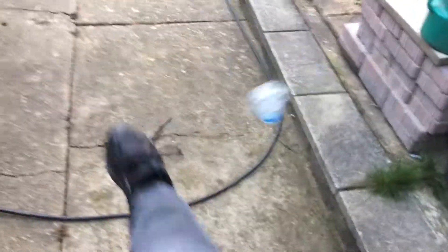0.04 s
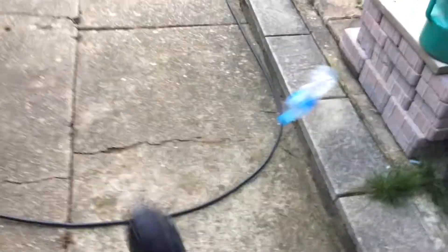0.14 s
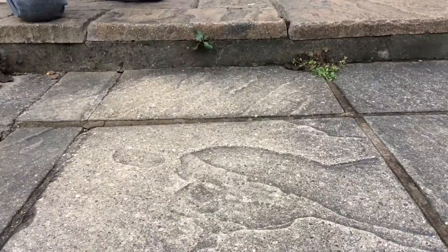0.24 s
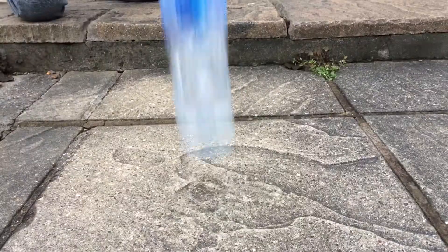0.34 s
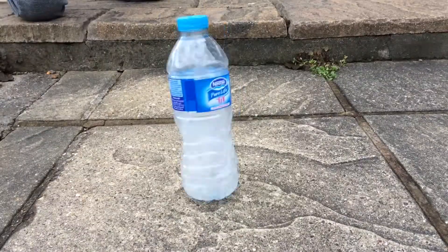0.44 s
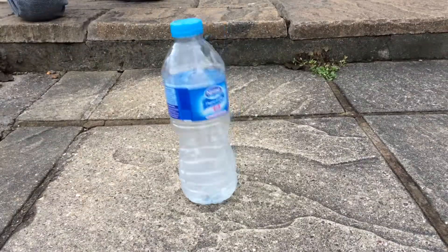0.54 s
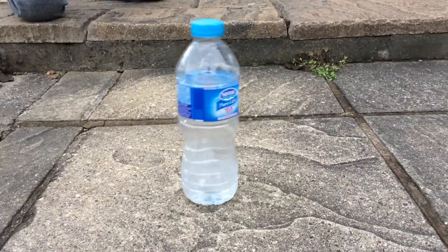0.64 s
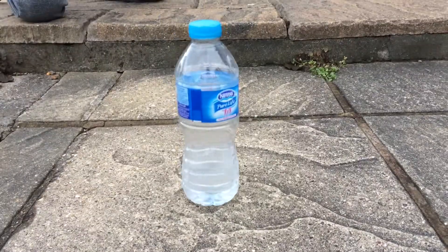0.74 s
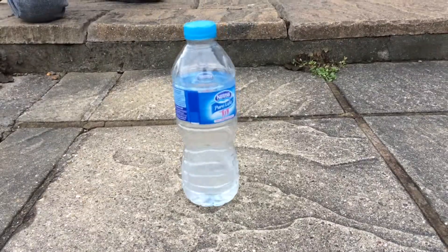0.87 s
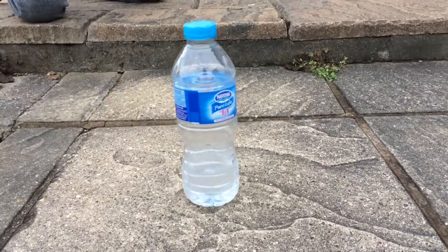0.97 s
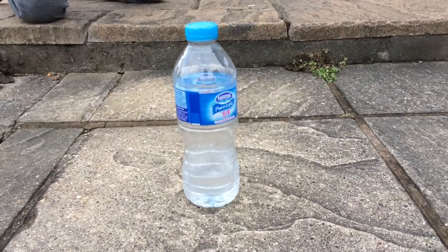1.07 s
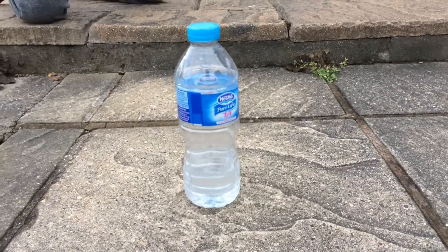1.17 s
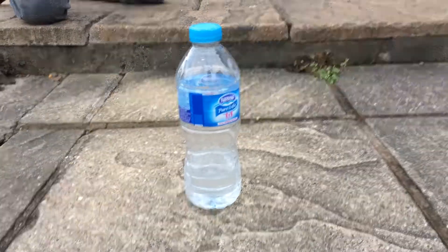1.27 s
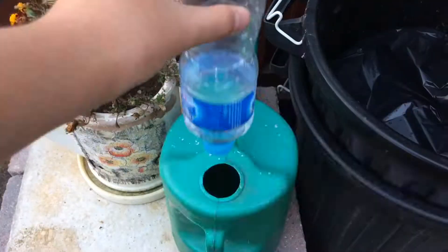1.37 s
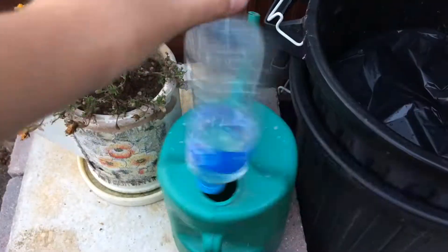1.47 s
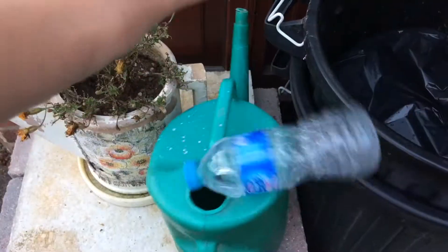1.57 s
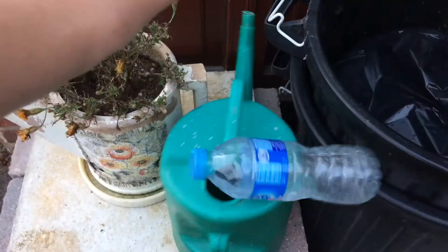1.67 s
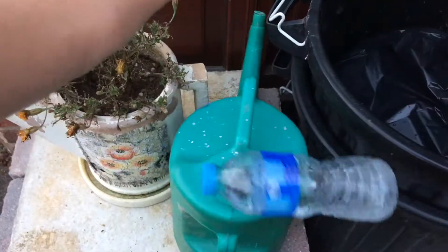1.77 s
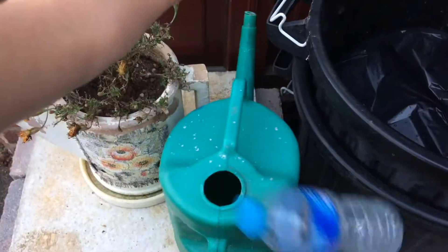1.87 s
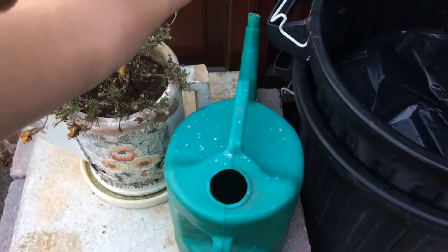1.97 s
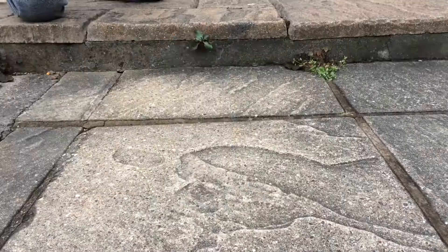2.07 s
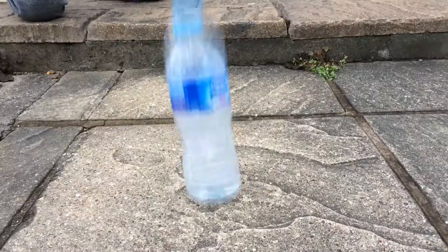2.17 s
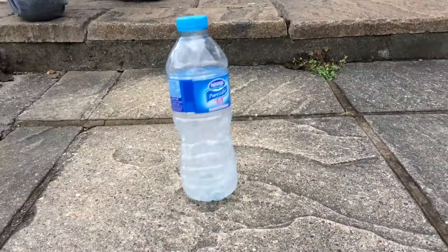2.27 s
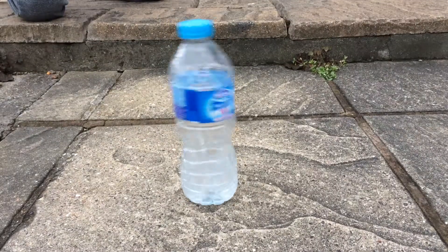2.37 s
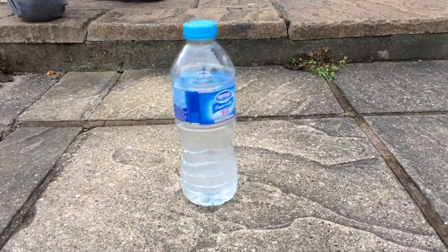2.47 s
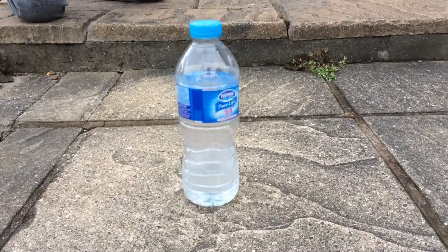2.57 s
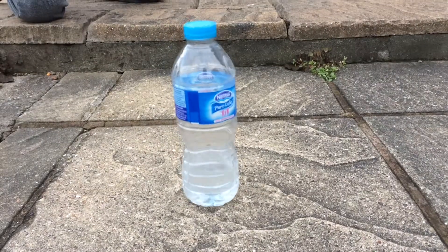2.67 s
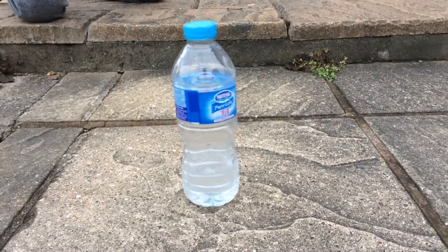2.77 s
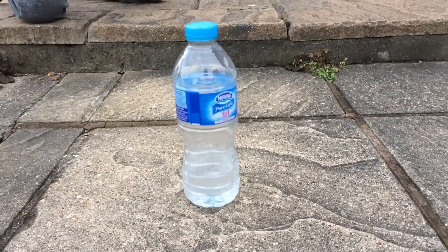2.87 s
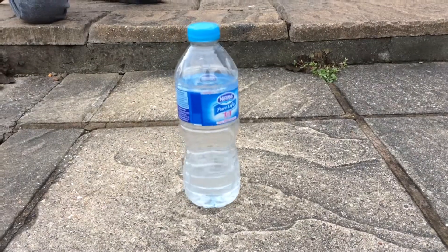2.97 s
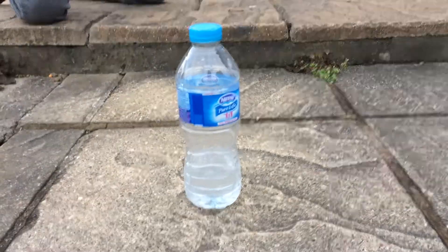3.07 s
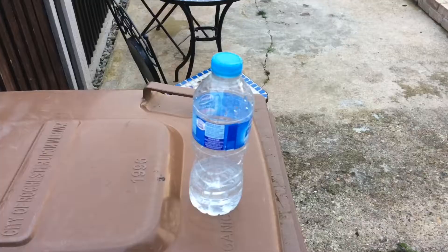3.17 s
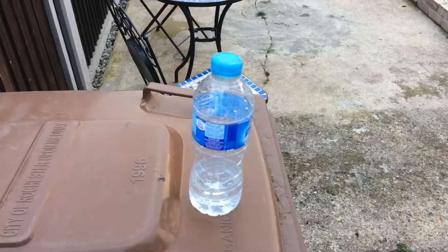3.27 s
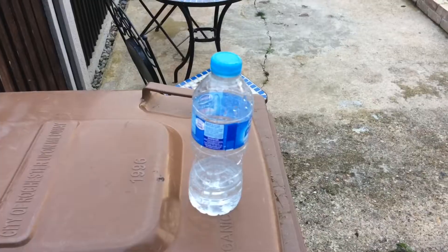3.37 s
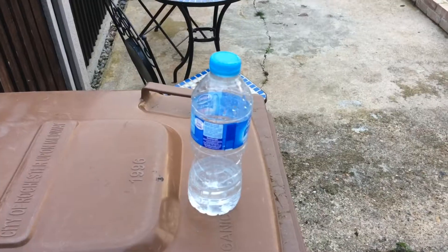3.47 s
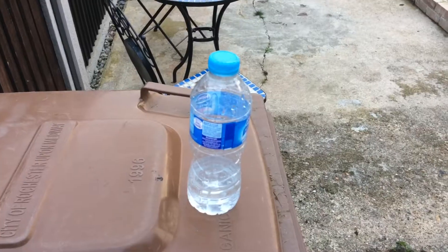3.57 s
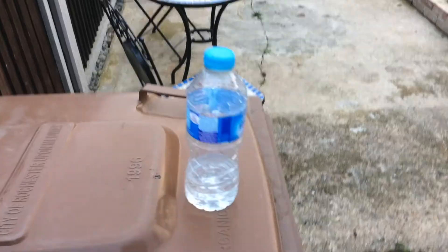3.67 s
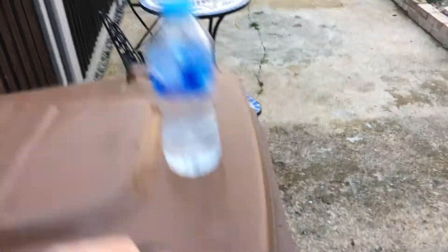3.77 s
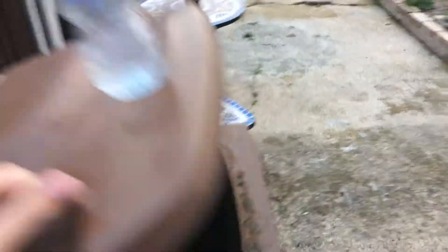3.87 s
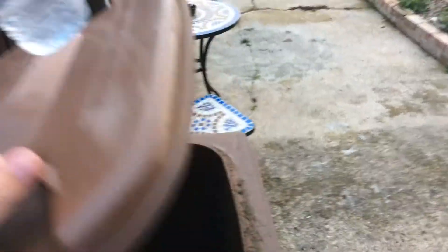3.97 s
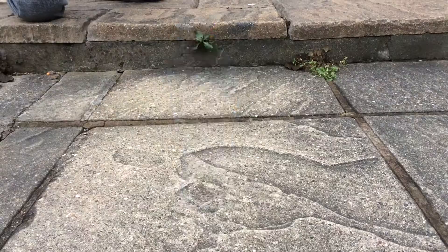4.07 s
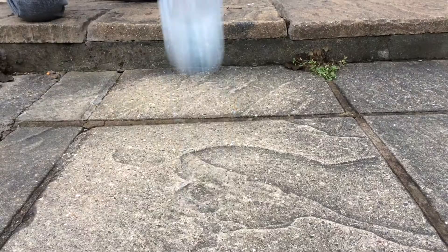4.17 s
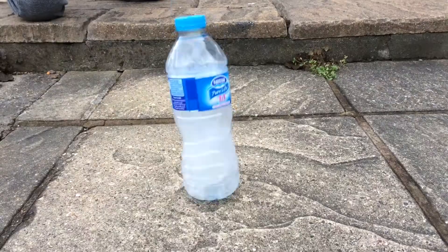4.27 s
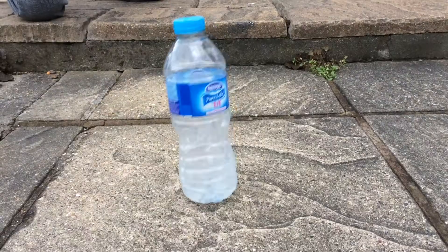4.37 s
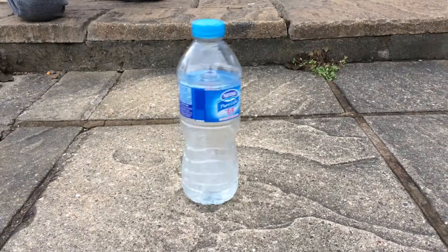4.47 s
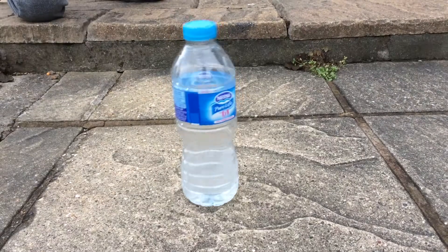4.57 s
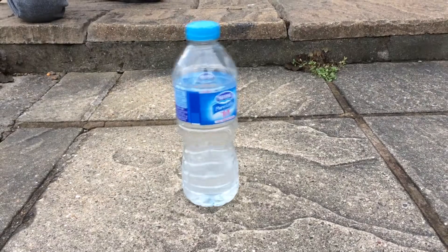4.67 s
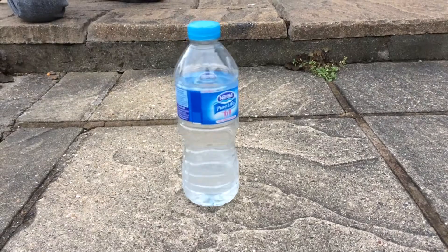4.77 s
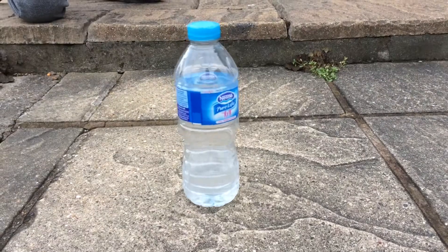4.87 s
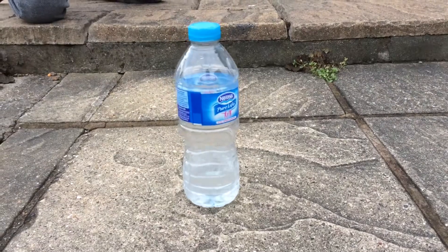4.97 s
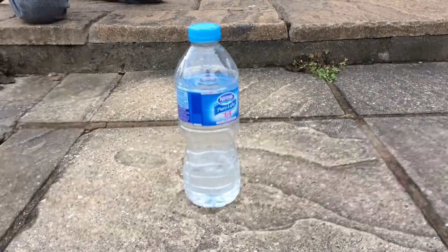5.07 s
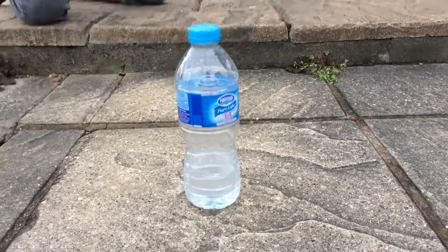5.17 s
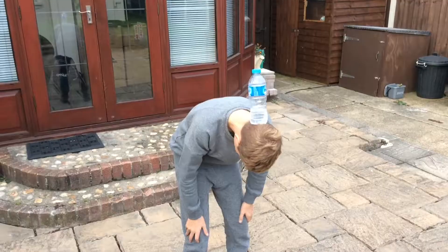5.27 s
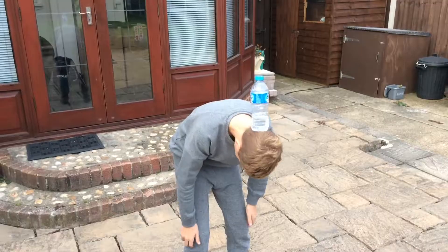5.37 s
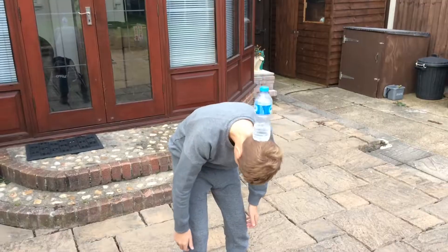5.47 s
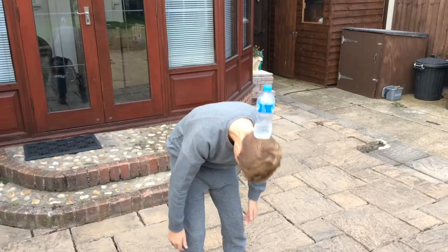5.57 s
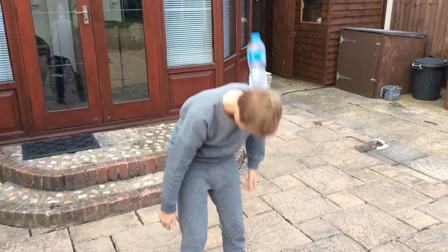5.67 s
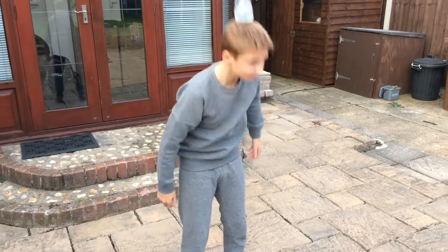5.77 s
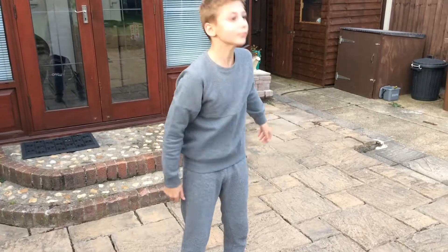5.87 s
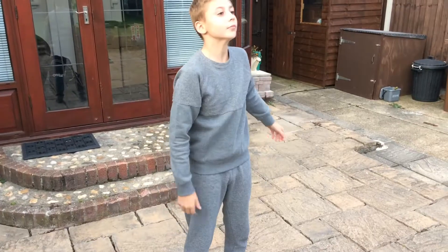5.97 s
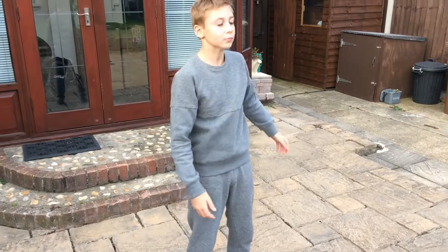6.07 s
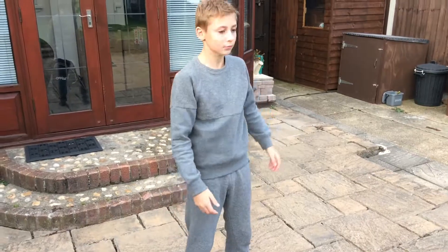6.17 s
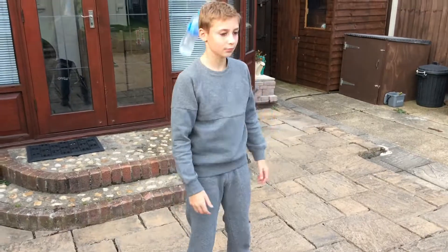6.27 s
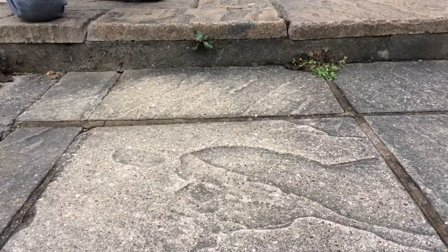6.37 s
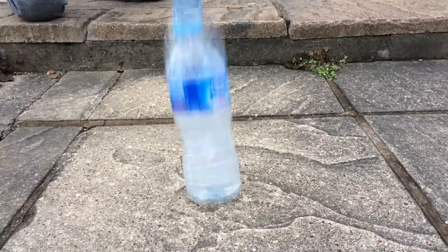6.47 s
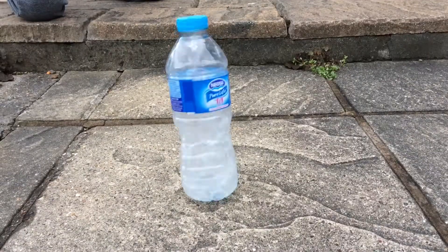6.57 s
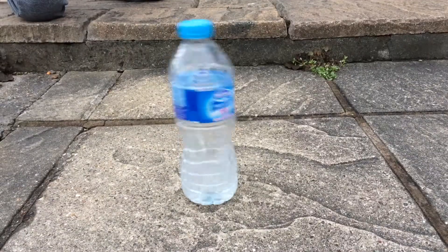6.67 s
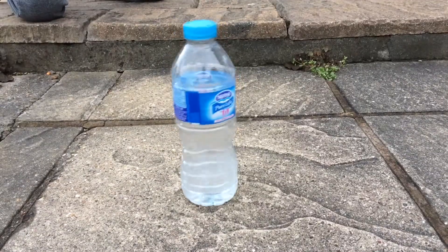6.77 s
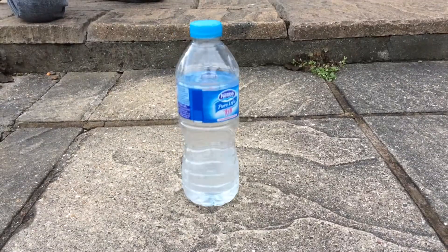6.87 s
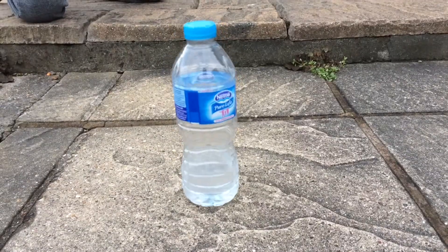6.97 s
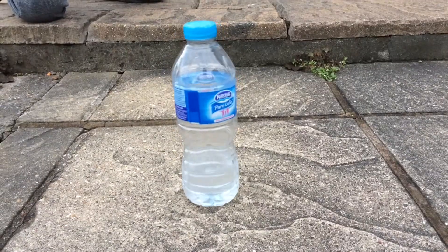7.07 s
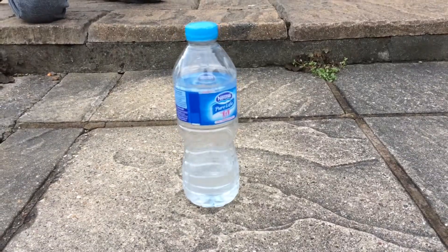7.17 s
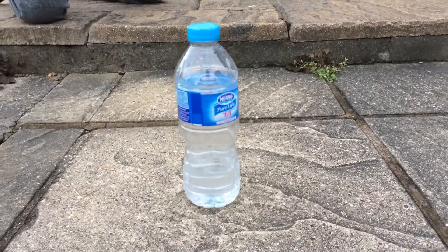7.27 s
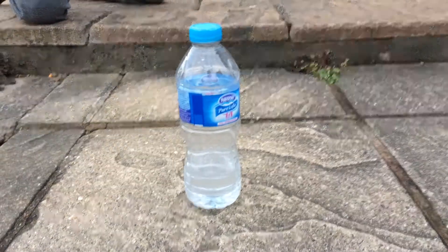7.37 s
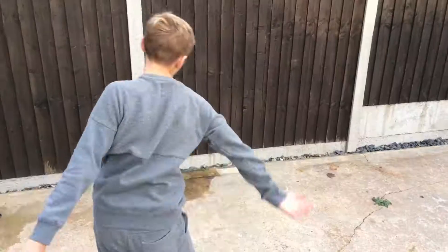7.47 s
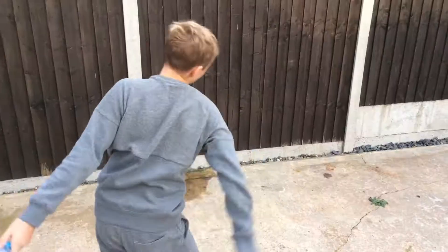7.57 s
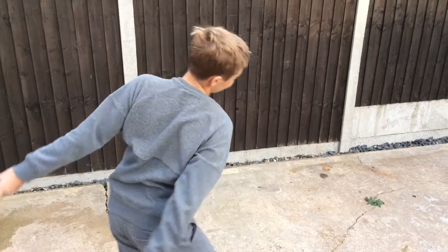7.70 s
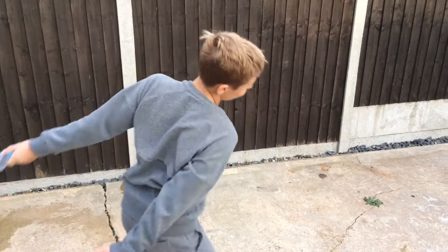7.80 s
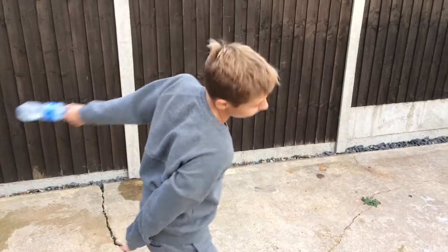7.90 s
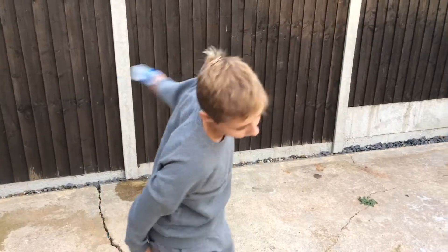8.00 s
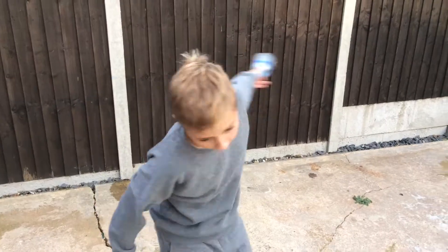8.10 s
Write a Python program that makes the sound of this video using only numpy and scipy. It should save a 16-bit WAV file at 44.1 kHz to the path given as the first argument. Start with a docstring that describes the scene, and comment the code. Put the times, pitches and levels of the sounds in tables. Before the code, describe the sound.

Quick outdoor cuts of bottle flipping: sharp plastic cracks, a watery thump repeated identically, hollow plastic knocks, a scraping slide, and quiet breezy garden air.

```python
"""A plastic crack, a thump, a low boom and a rush of water come first: bottle flips in a paved back garden.
Damped modes and shaped noise make the part-filled bottle, a hollow watering can and a bin lid pulled open.
Droplet pops and rising bubbles make the splash; noise makes the sliding, wind and far traffic; a bird whistles.
Six faded passages each have their own background; the upright landing on a slab is heard four times."""
import sys
import numpy as np
from scipy import signal
from scipy.fft import rfft, irfft, next_fast_len
from scipy.io import wavfile
from scipy.ndimage import map_coordinates

SR = 44100
rng = np.random.default_rng(int(sys.argv[2]) if len(sys.argv) > 2 else 0)


def file_out(sig):
    """Save sig as 16-bit WAV at sys.argv[1]."""
    # one column per channel
    cols = np.atleast_2d(sig).T
    # limit, then scale
    lim = np.clip(cols, -1, 1)
    pcm = np.round(lim * 32767).astype(np.int16)
    wavfile.write(sys.argv[1], SR, pcm)


N = 358966
TOP_HZ = 15450  # upper band limit


def amp(db):
    """Decibels to gain."""
    return 10 ** (np.asarray(db) / 20)


def unit(x):
    """x at rms 1."""
    return x / np.sqrt(np.mean(x ** 2) + 1e-20)


def clock():
    """Time axis of one blow, in seconds."""
    return np.arange(SR // 3) / SR


def timeline():
    """Time axis of the whole scene, in seconds."""
    return np.arange(N) / SR


def curves(rows):
    """One value per sample for each column after the time."""
    t_s, *columns = np.transpose(rows)
    return [np.interp(timeline(), t_s, column) for column in columns]


def wobble(knots_per_s):
    """A smooth random curve."""
    knots = rng.standard_normal(int(N * knots_per_s / SR) + 4)
    return map_coordinates(knots, [np.arange(N) * knots_per_s / SR])


def filtered(x, response):
    """x times a response of frequency."""
    size = next_fast_len(len(x) + 8192)
    spectrum = rfft(x, size) * response(np.fft.rfftfreq(size, 1 / SR))
    return irfft(spectrum, size)[:len(x)]


def noise(spectrum, size):
    """Noise of rms 1, coloured by rows of f/Hz, level/dB."""
    f_hz, level_db = np.transpose(spectrum)
    colour = lambda hz: amp(np.interp(np.log(hz + 1), np.log(f_hz), level_db))
    return unit(filtered(rng.standard_normal(size), colour))


def dying(t60_s):
    """A decay of 60 dB in t60_s."""
    return np.exp(-np.log(1000) * clock() / t60_s)


def rising(rise_s):
    """Contact onset, an exponential approach with time constant rise_s."""
    return 1 - np.exp(-clock() / rise_s)


def swell(s, hold_s, db, attack_s, release_s):
    """A gain that climbs 60 dB in attack_s up to s, holds, and falls 60 dB in release_s."""
    t = timeline() - s
    outside = np.maximum(0, np.maximum(-t / attack_s, (t - hold_s) / release_s))
    return amp(db) * np.exp(-np.log(1000) * outside)


def ring(modes, pitch, scatter, blur):
    """Damped modes; an off-centre blow scatters phases (0-1), a flexing wall widens lines by share blur."""
    out = np.zeros(len(clock()))
    for hz, db, t60_s in modes:
        step = np.sqrt(2 * np.pi * blur * hz / SR)
        wander = step * np.cumsum(rng.standard_normal(len(out)))
        start = scatter * rng.uniform(-np.pi, np.pi)
        phase = 2 * np.pi * hz * pitch * clock() + start + wander
        out += amp(db) * dying(t60_s) * np.sin(phase)
    return out


def add(track, s, sound):
    """Mix a sound into the track at s seconds."""
    part = track[max(round(s * SR), 0):][:len(sound)]
    part += sound[:len(part)]


# blows on the bottle: t/s, shell ring level/dB, crack level/dB, crack t60/s, shell pitch ratio
KNOCKS = [(.0005, -23, -16.5, 0.08, 1.0), (.4592, -11, -14, 0.07, 1.007), (1.5681, -16.5, -3, .032, .96),
          (1.662, -24.5, -46, .06, .63), (1.6755, -12.5, -19.5, 0.043, .93), (1.75, -28.5, -40, .1, .85),
          (1.898, -40, -38, .06, 1.13), (1.954, -35, -26.5, .05, 1.54)]
# thin shell modes: f/Hz before pitch ratio, level/dB, t60/s
SHELL_MODES = [(507, -20.5, 0.069), (624, -16.5, .05), (700, -18, 0.086), (903, -12.5, 0.055),
               (1109, -8, 0.059), (1218, -6, .035), (1402, 0, 0.025), (1505, -6.5, 0.03),
               (1495.4, -1, 0.031), (2052.4, -2.5, 0.05), (2140, -0.5, 0.032), (2293, -8, 0.029),
               (2270, -14, 0.013), (3124, -14.5, 0.033), (3323, -17, 0.065), (3780, -20.5, 0.033),
               (4390, -21, 0.035)]
# crack colour: f/Hz, level/dB
CRACK_SPECTRUM = [(60, -25), (300, -6.5), (700, -2.5), (1400, -1), (2700, -1.5), (3600, -2), (4800, -9.5),
                  (6500, -9), (10000, -15), (15000, -21.5)]


def bottle_shell(crack_rise_s=.0018, ring_lag_s=.0022, ring_rise_s=.00025):
    """The rim cracks first (noise); the thin shell rings (modes) once the weight follows."""
    out = np.zeros(N)
    for s, ring_db, crack_db, t60_s, pitch in KNOCKS:
        crack = rising(crack_rise_s) * dying(t60_s) * noise(CRACK_SPECTRUM, len(clock()))
        add(out, s, amp(crack_db) * crack)
        shell = rising(ring_rise_s) * ring(SHELL_MODES, pitch, scatter=.98, blur=.026)
        add(out, s + ring_lag_s, amp(ring_db) * shell)
    return out


# the water's weight hits the base: t/s, level/dB, pitch ratio
THUMPS = [(.001, -18.5, 1.69), (0.4517, -21, 0.43), (0.4609, -7, 1.0)]
# water modes: f/Hz before pitch ratio, level/dB, t60/s
WATER_MODES = [(110.1, -8, 0.06), (176, 2.5, 0.045), (255.5, -12, 0.096), (344, -23.5, 0.11)]


def water_thumps():
    """The water's weight on the base sounds a few short low modes."""
    out = np.zeros(N)
    for s, db, pitch in THUMPS:
        add(out, s, amp(db) * rising(.00069) * ring(WATER_MODES, pitch, scatter=0, blur=0))
    return out


def droplets(hz, spread, cycles, size_db, count):
    """A random stream of tiny decaying pops, rms 1; amplitude decays by 1/e in the given cycles."""
    place, tone, size = rng.random((count, 3)).T
    pitch_hz = np.clip(hz * np.exp(spread * (2 * tone - 1)), 100, TOP_HZ)[:, None]
    pop_samples = np.arange(SR // 100)
    turns = pitch_hz * pop_samples / SR
    level = amp(-size_db * np.log(1 - .99 * size))[:, None]  # few large, many small
    pops = level * np.exp(-turns / cycles) * np.sin(2 * np.pi * turns)
    at = (place * N).astype(int)[:, None] + pop_samples
    return unit(np.bincount(at.ravel(), pops.ravel(), minlength=N)[:N])


# water surges along the wall: t/s, hold/s, level/dB, release/s
SURGES = [(0, 0.011, -44, .5), (.445, .011, -54, .1), (0.477, 0.025, -40, 0.15), (.56, 0.074, -60.5, .9),
          (0.657, 0.013, -51.5, 0.17), (0.746, .025, -58.5, .09)]
# wash colour: f/Hz, level/dB
WASH_SPECTRUM = [(200, -7), (600, -3.5), (1400, 1.5), (4000, -5), (8000, -13), (15000, -22)]


def water_surges(attack_s=.032, wash_db=-5, drops_db=-1.5, fizz_db=-13):
    """Water along the wall: low drops, high fizz and a noise wash under shared swells."""
    drops = droplets(hz=2400, spread=1.3, cycles=2, size_db=5, count=5000)
    fizz = droplets(hz=8000, spread=.4, cycles=5, size_db=5, count=900)
    flow = sum(swell(s, hold_s, db, attack_s, release_s) for s, hold_s, db, release_s in SURGES)
    wash = noise(WASH_SPECTRUM, N)
    return flow * (amp(drops_db) * drops + amp(fizz_db) * fizz + amp(wash_db) * wash)


# echo colours, near and far: f/Hz, level/dB
NEAR_SPECTRUM = [(40, -9.5), (120, -3), (500, -2.5), (1500, -5.5), (3500, -1.5), (8000, 1), (15000, 2)]
FAR_SPECTRUM = [(40, -10.5), (120, 0), (600, -4), (1200, -3), (2100, -4.5), (4000, -1.5), (8000, -7.5),
                (15000, -15.5)]


def yard(x, near_db=-12, near_t60_s=.1, far_db=-23, far_t60_s=.38, wall_db=-24, wall_delay_s=.028):
    """Steps and fences scatter at once, the house wall later, the far garden longest and dullest."""
    def echo(db, spectrum, t60_s, rise_s):
        """A decaying noise response whose total energy is set by db."""
        tail = noise(spectrum, len(clock())) * rising(rise_s) * dying(t60_s)
        return amp(db) * tail / np.linalg.norm(tail)

    answer = echo(near_db, NEAR_SPECTRUM, near_t60_s, rise_s=.012)
    answer += echo(far_db, FAR_SPECTRUM, far_t60_s, rise_s=.02)
    add(answer, wall_delay_s, echo(wall_db, FAR_SPECTRUM, .059, rise_s=.00067))
    return signal.fftconvolve(x, answer)[:N]


# the opening blow's boom at 0 s, then wind gusts on the microphone: t/s, hold/s, level/dB
LOW_SWELLS = [(0, .02, -41), (0.488, .03, -51.5), (1.07, .02, -52.5), (1.353, .03, -46.5),
              (5.55, .03, -56.5), (6.22, .01, -59)]
# low colour of boom and wind: f/Hz, level/dB
BUFFET_SPECTRUM = [(15, -16.5), (45, -8.5), (78, 1), (130, -2.5), (190, -8), (280, -10.5), (420, -20),
                   (900, -45.5), (4000, -85.5)]


def boom_and_gusts(attack_s=.35, release_s=.5):
    """Swells of low noise: the opening blow's boom at 0 s, then wind gusts on the microphone."""
    gain = sum(swell(*row, attack_s, release_s) for row in LOW_SWELLS)
    return gain * noise(BUFFET_SPECTRUM, N)


# background colours: f/Hz, level/dB
TOWN_SPECTRUM = [(30, -11), (200, 3), (450, -1), (950, -2), (1400, -4.5), (2200, -18.5), (4000, -18),
                 (15000, -44)]
TYRES_SPECTRUM = [(200, -31), (600, -13), (950, 3.5), (1300, -3.5), (2000, -12), (5000, -34.5)]
HISS_SPECTRUM = [(100, -5), (2500, 0.5), (4500, -5), (8000, -3), (15000, -8)]


def background(tyres_sway_db=2.4, wind_flutter_db=3.5):
    """Town rumble, swaying far tyres, steady hiss and fluttering wind, each a coloured noise."""
    town = noise(TOWN_SPECTRUM, N)
    tyres = noise(TYRES_SPECTRUM, N) * amp(tyres_sway_db * wobble(3.5))
    hiss = noise(HISS_SPECTRUM, N)
    wind = unit(noise(BUFFET_SPECTRUM, N) * amp(wind_flutter_db * wobble(16)))
    return town, tyres, hiss, wind


# the landing passage: start/s, end/s
LANDING = (.272, 1.402)
# drone course: t/s, f/Hz, level/dB
DRONE = [(0.67, 214, -50.5), (0.69, 209, -53), (0.97, 225.5, -51.5), (1.146, 203.5, -59), (1.39, 193, -53)]


def drone(wobble_knots_per_s=110, swell_s=.34):
    """A narrow low drone behind the landing: random curves modulate two quadrature tones."""
    hz, db = curves(DRONE)
    phase = 2 * np.pi * np.cumsum(hz) / SR
    in_phase = wobble(wobble_knots_per_s) * np.sin(phase)
    quadrature = wobble(wobble_knots_per_s) * np.cos(phase)
    t = timeline()
    gate = np.clip((t - LANDING[0]) / swell_s, 0, 1) * (t < LANDING[1])
    return amp(db) * unit(in_phase + quadrature) * gate


def snap(hz, t60_s, below_db=-12, above_db=-15):
    """One small burst, a broad hump of noise around hz."""
    hump = [(hz / 20, 2 * below_db), (hz / 4, below_db / 2), (hz, 0),
            (hz * 3, above_db), (hz * 10, 2 * above_db)]
    return rising(.00056) * dying(t60_s) * noise(hump, len(clock()))


# drops fall back inside the bottle: t/s, bubble level/dB, starting f/Hz, t60/s
BUBBLES = [(0.3434, -34, 825, .027), (.666, -39, 536, 0.034), (.745, -30.5, 1110, .021),
           (.848, -42, 1184, 0.038), (.849, -45.5, 1740, .04), (.919, -38.5, 514, 0.038),
           (1.008, -43, 444, 0.049), (1.293, -42, 520, 0.034)]


def bubbles(glide_per_s=3.3, slap_db=-13, slap_hz=1670, slap_t60_s=.026):
    """Each falling drop slaps and traps a bubble that rings and rises in pitch."""
    out = np.zeros(N)
    t = clock()
    for s, db, hz, t60_s in BUBBLES:
        tone = np.sin(2 * np.pi * hz * t * (1 + glide_per_s * t))
        bubble = rising(.0023) * dying(t60_s) * tone
        slap = amp(slap_db) * snap(slap_hz, slap_t60_s)  # relative to its bubble
        add(out, s, amp(db) * (bubble + slap))
    return out


# single snaps of the thin shell, and a slap of water in flight at .437 s:
# t/s, level/dB, brightest f/Hz, t60/s
SNAPS_AND_SLAP = [(0.3436, -31, 4000, .02), (.437, -50, 1700, .04), (.55, -44, 7083, 0.024),
                  (0.6536, -39.5, 3260, .045), (.674, -39, 3500, .02), (.777, -43, 7800, 0.024),
                  (1.294, -49.5, 1691, .017), (1.423, -41.5, 600, .09), (1.4517, -30, 3500, .014),
                  (1.464, -37.5, 1808, .05), (1.736, -32, 2917, 0.042), (1.9542, -32, 7950, 0.049),
                  (2.026, -45, 2410, .044)]


def snaps_and_slap():
    """Short humps of noise: thin plastic snaps, and water slaps inside the flying bottle at .437 s."""
    out = np.zeros(N)
    for s, db, hz, t60_s in SNAPS_AND_SLAP:
        add(out, s, amp(db) * snap(hz, t60_s))
    return out


# crinkle runs: start t/s, length/s, mean level/dB, brightest f/Hz
CRINKLES = [(0.539, .18, -49.5, 3500), (0.808, .13, -62, 8500), (1.345, .04, -59.5, 4110),
            (1.58, .03, -28, 3497), (3.761, .08, -59, 7500), (4.039, 0.076, -55.5, 2500),
            (7.668, .16, -55.5, 4000)]


def shell_crinkles(gap_s=.032, scatter_db=1, t60_s=.025):
    """The shell crinkles at uneven gaps as it settles or is gripped."""
    out = np.zeros(N)
    for start_s, length_s, mean_db, hz in CRINKLES:
        for s in np.arange(start_s, start_s + length_s, gap_s):
            db = rng.normal(mean_db, scatter_db)
            add(out, s + gap_s * rng.random(), amp(db) * snap(hz, t60_s))
    return out


# plastic slides on plastic: t/s, hold/s, level/dB, attack/s, release/s
SLIDES = [(1.431, .045, -50, .03, .06), (1.715, 0.21, -45.5, 0.57, 0.42), (3.749, .06, -58.5, 0.22, 0.88)]
# scuff colour: f/Hz, level/dB
SCUFF_SPECTRUM = [(100, -23.5), (500, 11), (1500, 8), (5000, -6.5), (9000, -8), (15000, -23)]


def plastic_slides(grain_db=5):
    """Plastic slides in many tiny slips: noise with a fast random level."""
    scuff = unit(noise(SCUFF_SPECTRUM, N) * amp(grain_db * wobble(260)))
    return sum(swell(*slide) for slide in SLIDES) * scuff


def chatter(hits, gap_s, dulling, count):
    """Blows repeat every gap_s, losing level and brightness: rows of t/s, level/dB, brightness/Hz."""
    return [(s + k * gap_s, db - k * loss_db, hz * dulling ** k)
            for s, db, hz, loss_db in hits for k in range(count)]


# weak-mode rattle colour of a hollow body: f/Hz, level/dB
HOLLOW_SPECTRUM = [(30, -21), (75, -5), (220, -3.5), (450, -4), (700, -10.5), (1000, -8.5), (2000, -20.5),
                   (6000, -33)]


def hollow(hits, modes, rattle_db, rattle_t60_s, rise_s, blur):
    """Big plastic body: strong modes among many weak ones (noise); soft blows reach only the low ones."""
    out = np.zeros(N)
    for s, db, bright_hz in hits:
        rattle = amp(rattle_db) * dying(rattle_t60_s) * noise(HOLLOW_SPECTRUM, len(clock()))
        body = ring(modes, pitch=.97, scatter=.95, blur=blur) + rattle
        softness = signal.butter(1, min(bright_hz, SR / 4), fs=SR)
        add(out, s, amp(db) * signal.lfilter(*softness, rising(rise_s) * body))
    return out


# bottle strikes the can: t/s, level/dB, first brightness f/Hz, loss per rebound/dB
CAN_HITS = [(1.5705, -11.5, 1500, 21), (1.583, -19.5, 1001, 4), (1.66, -24.5, 350, 15),
            (1.752, -23, 800, 2.5), (1.868, -36, 230, 0.5), (2.026, -35, 301, 0)]
# can modes: f/Hz before hollow()'s pitch ratio, level/dB, t60/s
CAN_MODES = [(80, -5, 0.22), (91, -2.5, 0.14), (144, -5, 0.19), (212.2, -9.5, 0.1), (254.8, -7, 0.1),
             (368, 0.5, 0.1), (433.4, -7, 0.19), (645, 0, 0.055), (883, -5.5, .11), (980, -7, .14),
             (1536, -7, 0.06), (2480, -4.5, 0.06), (4000, -18, 0.14)]


def watering_can():
    """The bottle strikes the hollow can and chatters on it."""
    hits = chatter(CAN_HITS, gap_s=.019, dulling=.85, count=5)
    return hollow(hits, CAN_MODES, rattle_db=-4.5, rattle_t60_s=.089, rise_s=.001, blur=.013)


def can_rumble(level_db=-33, attack_s=.06, hold_s=.22, release_s=1.44):
    """The can rumbles as it rocks after the first blow: one swell of low noise."""
    gain = swell(CAN_HITS[0][0], hold_s, level_db, attack_s, release_s)
    return gain * noise(BUFFET_SPECTRUM, N)


# jolts of the bin lid: t/s, level/dB, first brightness f/Hz, loss per rebound/dB
LID_HITS = [(3.735, -37.5, 1500, 3.5), (3.75, -32, 250, 3), (4.027, -34, 1080, 1.5), (4.072, -32.5, 900, 8)]
# lid modes: f/Hz before hollow()'s pitch ratio, level/dB, t60/s
LID_MODES = [(76.6, 2.5, 0.22), (104, 0.5, 0.11), (168.3, -10.5, 0.071), (285, -10, 0.063),
             (403, -1.5, 0.066), (574, -9, 0.069), (780, -8, 0.057)]


def bin_lid():
    """The lid is pulled open in jolts and chatters, a hollow body too."""
    hits = chatter(LID_HITS, gap_s=.021, dulling=.77, count=5)
    return hollow(hits, LID_MODES, rattle_db=-6, rattle_t60_s=.13, rise_s=.0024, blur=.0098)


# the thrower's clothes move: t/s, hold/s, level/dB
MOVES = [(5.654, 0.035, -70.5), (5.98, .22, -77), (7.802, .06, -73)]
# cloth colour: f/Hz, level/dB
CLOTH_SPECTRUM = [(800, -9), (2500, -3.5), (5000, 0.5), (7000, -7.5), (14000, -12.5)]


def clothes(weave_db=2, attack_s=1.3, release_s=1.4):
    """Cloth rubs in tiny slips: noise with a random level, slowly swelling."""
    cloth = unit(noise(CLOTH_SPECTRUM, N) * amp(weave_db * wobble(120)))
    return sum(swell(*move, attack_s, release_s) for move in MOVES) * cloth


# distant bird: t/s, hold/s, level/dB, starting f/Hz
WHISTLE = (5.47, .05, -74, 5151)


def bird(fall_hz=800, fall_s=.075, attack_s=.08, release_s=.12):
    """One faint whistle that starts level, bends down ever faster and fades out."""
    s, hold_s, db, start_hz = WHISTLE
    bend = np.clip((timeline() - s) / fall_s, 0, 1) ** 2
    tone = np.sin(2 * np.pi * np.cumsum(start_hz - fall_hz * bend) / SR)
    return swell(s, hold_s, db, attack_s, release_s) * (1 - bend ** 2) * tone


# passages: start/s, end/s, then levels/dB of town rumble, far tyres, hiss, wind
PASSAGES = [(-.05, 0.27, -73, -66, -67, -63), (0.274, 1.403, -63.5, -77.5, -76, -55.5),
            (1.406, 2.068, -61.5, -67, -73, -57), (3.205, 4.135, -66.5, -68.5, -76.5, -53.5),
            (5.271, 6.339, -61.5, -66, -78.5, -67), (7.503, 8.2, -66, -65, -72.5, -55.5)]
# landing repeats: start t/s
REPEATS = [2.072, 4.13867, 6.372]


def passages(x, fade_in_s=.028, fade_out_s=.035):
    """Each passage fades in and out with its own background; the landing is copied to three more times."""
    t, out = timeline(), np.zeros(N)
    layers = background()
    for start_s, end_s, *levels_db in PASSAGES:
        fade = np.clip((t - start_s) / fade_in_s, 0, 1) * np.clip((end_s - t) / fade_out_s, 0, 1)
        behind = sum(amp(db) * layer for db, layer in zip(levels_db, layers))
        out += fade * (x + behind)
    landing = out[round(LANDING[0] * SR):round(LANDING[1] * SR)].copy()
    for s in REPEATS:
        add(out, s, landing)
    return out + amp(-80) * noise(BUFFET_SPECTRUM, N)  # faint bed throughout


def scene():
    """All that is struck or rubbed, with the yard's answer and the open air."""
    direct = bottle_shell() + water_thumps() + water_surges() + bubbles()
    direct += snaps_and_slap() + shell_crinkles() + plastic_slides()
    direct += watering_can() + bin_lid() + clothes()
    without_echo = boom_and_gusts() + drone() + can_rumble() + bird()
    return passages(direct + yard(direct) + without_echo)[None]


def record(dry, low_cut_hz=54):
    """The microphone sheds deep bass, rounds peaks off at full scale and cuts steeply above TOP_HZ."""
    lean = signal.lfilter(*signal.butter(2, low_cut_hz, "highpass", fs=SR), dry[0])
    rounded = lean / (1 + lean ** 8) ** (1 / 8)
    return filtered(rounded, lambda hz: 1 / (1 + (hz / TOP_HZ) ** 200))[None]


dry = scene()
out = record(dry)
file_out(out)
```